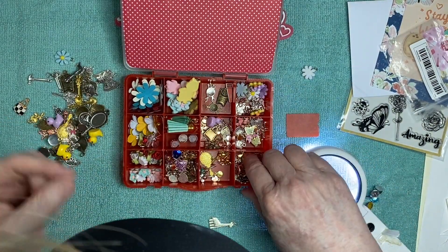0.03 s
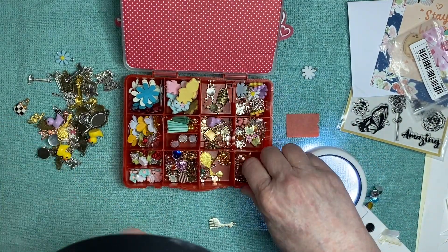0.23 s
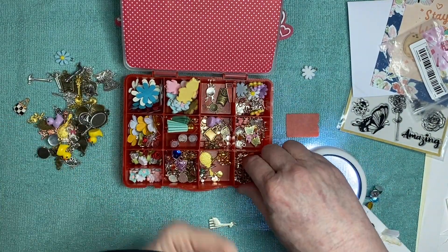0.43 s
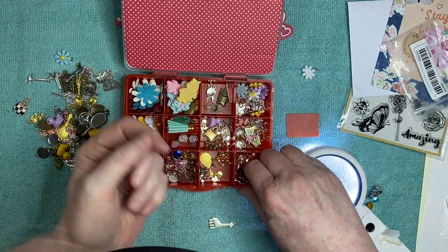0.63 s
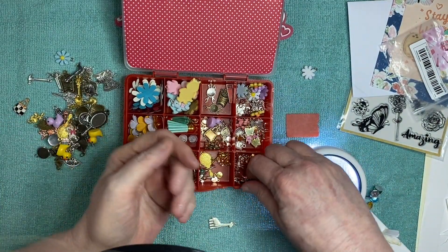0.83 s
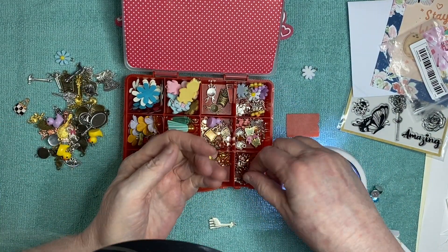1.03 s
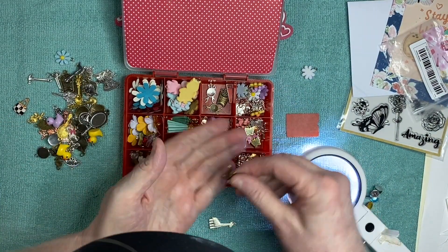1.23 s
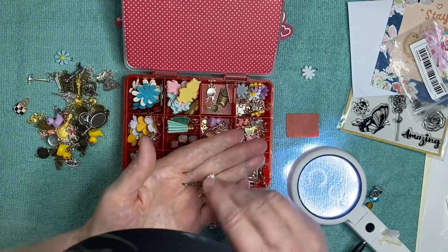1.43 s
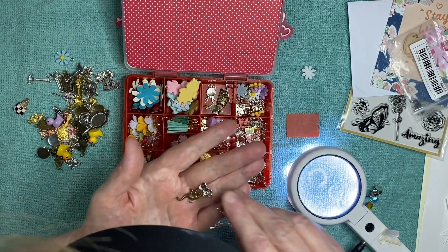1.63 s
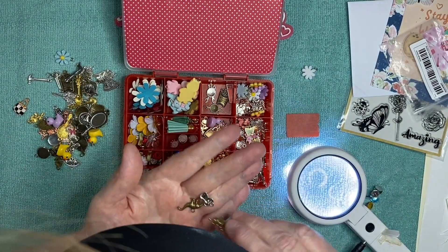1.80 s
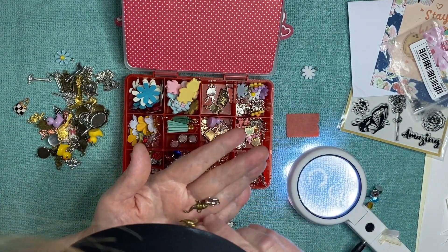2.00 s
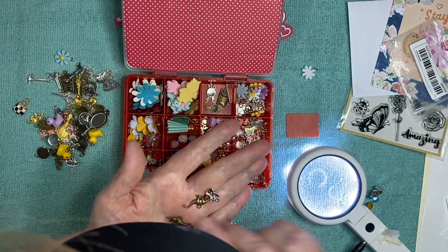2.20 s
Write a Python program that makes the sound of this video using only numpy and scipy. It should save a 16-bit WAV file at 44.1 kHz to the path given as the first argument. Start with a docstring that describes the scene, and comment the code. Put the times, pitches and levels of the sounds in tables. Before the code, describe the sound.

Small metal charms grind, jingle and tick against a plastic organizer box as fingers dig through them, a few dropping back at about one second, then faint bright clinks in a palm; close microphone, small quiet room.

```python
"""Fingers rummage through small metal charms in one compartment of a plastic organizer box on a cloth-covered table.
The charms grind and click (short noise bursts and rings) and knock on the box (a few dying tones).
A few charms drop back as the hand lifts out, and tiny clinks with high rings follow in the open palm.
Soft rubs of skin and low rumbles are bands of noise; a small room adds echoes, air noise and a faint hum."""
import sys
import numpy as np
from scipy import signal
from scipy.fft import rfft, irfft, next_fast_len
from scipy.io import wavfile
from scipy.ndimage import uniform_filter1d

SR = 44100
rng = np.random.default_rng(int(sys.argv[2]) if len(sys.argv) > 2 else 0)


def master(y):
    """Save y as 16-bit WAV."""
    cut = np.clip(np.atleast_2d(y).T, -1, 1)
    pcm = np.round(cut * 32767)  # scale
    wavfile.write(sys.argv[1], SR, pcm.astype(np.int16))


N = 99401
T = np.arange(N) / SR


def from_db(db):
    """Turn decibels into a gain."""
    return 10 ** (np.asarray(db) / 20)


def rms_one(x):
    """Scale to an rms (average strength) of 1."""
    return x / np.sqrt(np.mean(x ** 2) + 1e-20)


def at_hz(points, hz):
    """Read a table between its points, on a log-frequency axis."""
    table_hz, values = np.transpose(points)
    return np.interp(np.log(hz + 1), np.log(table_hz), values)


def cut(x, order, hz, kind):
    """Filter that keeps the part below ("low"), above ("high") or between ("band") the given pitches."""
    return signal.sosfilt(signal.butter(order, hz, kind, fs=SR, output="sos"), x)


def colour(x, spectrum):
    """Give x the tone colour of a table, with a filter that answers as early as it can (minimum phase)."""
    size = 2048
    level_db = at_hz(spectrum, np.fft.rfftfreq(size, 1 / SR))
    cepstrum = irfft(np.log(from_db(level_db)))
    # folding the second half onto the first removes any sound before the click
    cepstrum[1:size // 2] *= 2
    cepstrum[size // 2 + 1:] = 0
    response = irfft(np.exp(rfft(cepstrum)))
    return signal.fftconvolve(x, response)[:N]


def clicks(start_s, level_db):
    """Place one single-sample click at each time."""
    out = np.zeros(N)
    places = np.clip(np.asarray(start_s) * SR, 0, N - 1).astype(int)
    np.add.at(out, places, from_db(level_db))
    return out


def ring(x, hz, t60):
    """A small resonator: a unit click starts a sine of height 1 that falls by 60 dB in t60 seconds."""
    shrink = from_db(-60 / (t60 * SR))
    step = 2 * np.pi * hz / SR
    return signal.lfilter([0, np.sin(step)], [1, -2 * shrink * np.cos(step), shrink ** 2], x + 1e-18)


CRACK_RISE_S = 0.00079  # a contact skids briefly before it peaks


def crack(x, decay_s):
    """Each click becomes a burst of noise that swells and dies at once."""
    power = signal.lfilter([1], [1, -np.exp(-2 / (decay_s * SR))], x ** 2 + 1e-20)
    rise = np.exp(-1 / (CRACK_RISE_S * SR))
    loudness = np.sqrt(signal.lfilter([1 - rise], [1, -rise], power))
    return loudness * rng.standard_normal(N)


def swell(middle_s, length_s, level_db, centre_hz, octaves):
    """A band of friction noise that rises to its level at the middle and falls again."""
    edges = [centre_hz * 2 ** (-octaves / 2), centre_hz * 2 ** (octaves / 2)]
    noise = rms_one(cut(rng.standard_normal(N), 2, edges, "band"))
    hump = np.cos(np.pi * np.clip((T - middle_s) / length_s, -.5, .5))
    return from_db(level_db) * noise * hump


# tone colour of the ventilation noise, before it is set to its overall level: pitch_hz, relative_level_db
AIR_COLOUR = [(20, -22), (40, -8), (62, -3), (100, -3), (190, -7), (340, -9), (520, -8), (820, -11.5),
              (1040, -15.5), (1300, -21), (2000, -26.5), (3000, -35), (3500, -35), (4300, -40.5),
              (6300, -51), (10000, -47), (16000, -56)]
# how alike the room noise is at left and right: pitch_hz, likeness (0 to 1)
LEFT_RIGHT_LIKENESS = [(60, 1), (150, .93), (300, 0.77), (700, 0.097), (2000, 0.31), (8000, 0.099)]
# hum and faint whine of the ventilation: pitch_hz, level_db
HUM_LINES = [(61, -70), (325, -70), (458, -67.5), (805, -76), (1017, -70), (3480, -88.5)]
AIR_DB = -56.5
HUM_WIDTH_HZ = 6.2  # this far from its centre a hum line has half its strength


def room_noise():
    """Ventilation: steady coloured noise, plus hum lines made wavering by their narrow width."""
    hz = np.fft.rfftfreq(N, 1 / SR)
    alike = np.clip(at_hz(LEFT_RIGHT_LIKENESS, hz), 0, 1)
    shared, opposed = rfft(rng.standard_normal((2, N))) * from_db(at_hz(AIR_COLOUR, hz))
    air = np.sqrt(1 + alike) * shared + np.sqrt(1 - alike) * opposed * [[1], [-1]]
    air = rms_one(irfft(air, N))
    white = rfft(rng.standard_normal(N))
    hum = 0
    for line_hz, level_db in HUM_LINES:
        narrow = white / (1 + ((hz - line_hz) / HUM_WIDTH_HZ) ** 2)
        hum = hum + from_db(level_db) * rms_one(irfft(narrow, N))
    return from_db(AIR_DB) * air + hum


def reflections(x, t60, cut_hz):
    """Dense dying echoes, different at each side: x is smeared by a fading noise tail."""
    tail = rng.standard_normal((2, N)) * from_db(-60 * T / t60)
    tail = cut(tail * (T > .001), 1, cut_hz, "low")
    return signal.fftconvolve(x[None], rms_one(tail) / np.sqrt(N), axes=1)[:, :N]


# how far the phase of left is turned ahead of right: pitch_hz, left_lead_radians
STEREO_PHASE = [(1800, 0), (2900, .9), (4300, .9), (5000, .2), (7100, 3.05), (7700, 3.3), (10000, 6.2),
                (11200, 6.3), (13000, 9.2), (13800, 9.55), (15200, 11.2)]
PAN_DB = -0.13  # added at left, taken away at right


def stereo_processing(x):
    """Stereo processing turns the phase of left against right, by an amount that depends on pitch."""
    size = next_fast_len(N + SR // 10)
    lead = np.interp(np.fft.rfftfreq(size, 1 / SR), *np.transpose(STEREO_PHASE))
    # half of the lead goes forward on the left, half backward on the right
    both = irfft(rfft(x, size) * np.exp(.5j * lead * [[1], [-1]]), size)[:, :N]
    return both * from_db([[PAN_DB], [-PAN_DB]])


# the pushed box rumbles on the table: middle_s, length_s, peak_level_db
SHOVE_TIMES = [(0.03, 0.109, -54), (0.125, 0.079, -59), (0.198, 0.072, -46.5), (0.248, 0.026, -46.5),
               (0.599, 0.12, -53), (0.71, 0.23, -58.5)]
SHOVE_HZ, SHOVE_OCTAVES = 82.7, 1.8  # centre and width of the rumble


def shoves():
    """The nudged box rubs on the table: short swells of low noise."""
    return sum(swell(*row, SHOVE_HZ, SHOVE_OCTAVES) for row in SHOVE_TIMES)


# skin slides over skin and charms: middle_s, length_s, peak_level_db, centre_hz, width_octaves
SKIN_RUBS = [(1.156, 0.033, -68, 3470, 0.27), (1.183, 0.02, -64, 1800, 0.35), (1.37, 0.11, -73, 3500, 0.27),
             (1.7, 0.12, -76, 9700, 0.44), (2.23, 0.058, -62.5, 1707, 2.6),
             (2.233, 0.045, -64, 10340, 0.43)]
RUB_GRAIN_DB = 1.5  # typical swing of the loudness as skin catches and slips


def rubs():
    """Skin catches and slips as it slides: swells of noise with a grainy loudness."""
    wander = rms_one(uniform_filter1d(rng.standard_normal(N), size=100))
    grain = rms_one(from_db(RUB_GRAIN_DB * wander))
    return grain * sum(swell(*row) for row in SKIN_RUBS)


# charms meet in the palm: start_s, ring_db, tick_db, free (multiplies the ring times of the charm)
CLINKS = [(1.356, -69, -43.5, 0.68), (1.428, -46.5, -31, 1.7), (1.532, -45, -61, 0.5)]
# the tones of the charm in the palm: pitch_hz, level_db (added to ring_db), t60_s (before free)
CHARM_TONES = [(11630, -10, 0.12), (14080, -18, 0.13), (15680, 0.5, 0.1), (16100, -7.5, 0.02)]
PALM_TICK_S, PALM_TICK_HZ = 0.00032, 11500  # the thin tick: decay, lowest pitch
PALM_BEAT_HZ = 21  # gap between the two tones of a pair, before division by free


def palm():
    """Charms clink in the hand: a thin tick, then pairs of close tones that beat, damped by the skin."""
    start_s, _, tick_db, _ = np.transpose(CLINKS)
    out = cut(crack(clicks(start_s, tick_db), PALM_TICK_S), 2, PALM_TICK_HZ, "high")
    for start_s, ring_db, _, free in CLINKS:
        for hz, level_db, t60 in CHARM_TONES:
            blow = clicks([start_s], [ring_db + level_db])
            out = out + ring(blow, hz, t60 * free)
            out = out + .5 * ring(blow, hz + PALM_BEAT_HZ / free, t60 * free / 2)
    return out


# a fingertip presses charms against a divider: start_s, level_db
DIVIDER_KNOCKS = [(.029, -30), (0.3668, -28), (0.3697, -35), (0.766, -28.5), (0.769, -27.5), (.9115, -30.5)]
# the tones of the divider: pitch_hz, level_db (added to the knock), t60_s
DIVIDER_TONES = [(1000, -16.5, 0.028), (1342, -1.5, 0.02), (1630, -7, 0.0103)]


def wall_knocks():
    """Dull knocks on the divider between compartments: each sets its few tones ringing briefly."""
    blows = clicks(*np.transpose(DIVIDER_KNOCKS))
    return sum(from_db(level_db) * ring(blows, hz, t60) for hz, level_db, t60 in DIVIDER_TONES)


# the tones of the plastic box: pitch_hz, level_db (added to the contact), t60_s
BOX_TONES = [(1008, -14, 0.02437), (1372, -12, 0.014), (1800, -11, 0.01), (2130, 2.5, 0.017),
             (2360, 1.5, 0.015), (4730, -10, .008), (5018, -3.5, 0.013), (5456, -10, 0.0066),
             (8200, -6, 0.016)]
SPOTS = 12
SPOT_DETUNE = 0.0088  # from spot to spot the pitches shift by up to this share, up or down


def box(x, vary_db):
    """Each contact lands on one of a dozen spots, and tones of uneven strength ring with alternating sign."""
    spot = rng.integers(0, SPOTS, N)
    strengths = from_db(vary_db * rng.standard_normal((len(BOX_TONES), N))) * x
    out = 0
    for k, detune in enumerate(np.exp(SPOT_DETUNE * np.linspace(-1, 1, SPOTS))):
        here = spot == k
        for m, (hz, level_db, t60) in enumerate(BOX_TONES):
            # neighbouring tones swing against each other, so a knock swells and stops short
            out = out + (-1) ** m * from_db(level_db) * ring(strengths[m] * here, hz * detune, t60)
    return out


# tone colour of metal on metal, for the jingle, the ticks and the hard clicks: pitch_hz, level_db
METAL_COLOUR = [(300, -15.5), (750, -20.5), (1000, -7.5), (1600, -4.5), (2250, 0.5), (3500, -7.5),
                (5200, 2.5), (6500, -3.5), (9300, -5), (12500, -8), (15500, -7)]
JINGLE_T60_S, JINGLE_LOW_HZ, JINGLE_HIGH_HZ = 0.022, 2590, 14980


def jingle(touches):
    """Each touch sets one of 30 small charms ringing, damped at once by the heap."""
    pitches = np.geomspace(JINGLE_LOW_HZ, JINGLE_HIGH_HZ, num=30) * rng.uniform(.98, 1.02, 30)
    dealt = rng.integers(0, len(pitches), N)
    out = 0
    for k, hz in enumerate(pitches):
        out = out + ring(touches * (dealt == k), hz, JINGLE_T60_S) * from_db(at_hz(METAL_COLOUR, hz))
    return out


TOUCH_DECAY_S = 0.0016
TICK_VARY_DB, SPLIT_HZ = 7.5, 7100  # the parts below and above the split vary separately


def ticks(touches):
    """Dry metal ticks: noise bursts, some dull and some bright."""
    out = 0
    for kind in ("low", "high"):
        uneven = touches * from_db(TICK_VARY_DB * rng.standard_normal(N))
        out = out + cut(crack(uneven, TOUCH_DECAY_S), 2, SPLIT_HZ, kind)
    # the division evens out the energy that a longer decay would add
    return colour(out, METAL_COLOUR) / np.sqrt(TOUCH_DECAY_S * SR / 2)


# single hard contacts: start_s, click_db (before CLICK_DB), box_knock_db (before KNOCK_DB)
HARD_HITS = [(.029, -10.5, -26.5), (0.0664, -11.5, -31), (0.0952, -20, -38.5), (0.1635, -14.5, -27.5),
             (0.1731, -12, -30.5), (.2035, -28, -28.5), (.2205, -27.5, -25), (0.2428, -20, -28),
             (.2866, -22, -28.5), (.3664, -27.5, -26), (.3695, -27.5, -27), (0.3769, -18, -26),
             (0.387, -5, -21.5), (.3905, -9, -26), (0.397, -19.5, -29), (0.4112, -9, -30),
             (0.4521, -24.5, -54), (0.514, -24, -68.5), (0.5987, -15.5, -31), (.657, -19.5, -26),
             (0.7015, -10.5, -27), (0.7054, -1.5, -26.5), (.7295, -14.5, -31), (.755, -19.5, -38),
             (0.7645, -31, -27), (0.7848, -22.5, -24.5), (0.7943, -22, -26), (0.8036, -31.5, -27.5),
             (0.8719, -27, -41.5), (0.882, -24, -43.5), (.894, -22, -48.5), (.911, -7.5, -18.5),
             (0.9162, -18.5, -37), (0.9335, -11, -18.5), (0.9355, -9.5, -17.5), (0.9407, -13.5, -25),
             (0.9454, -0.5, -12.5), (0.9581, -14.5, -22), (0.9627, -9, -20), (0.9652, -14, -22.5),
             (0.9761, -14, -23.5), (0.9826, -26.5, -28)]
# a loose charm rings on: start_s, pitch_hz, level_db, t60_s
LOOSE_RINGS = [(0.07, 11830, -33.5, 0.038), (0.7023, 5330, -22, .03), (0.795, 11860, -45.5, 0.11),
               (0.913, 12040, -31.5, 0.05), (0.961, 15160, -20.5, 0.045), (.969, 15200, -31, 0.12)]
CLICK_DB, KNOCK_DB = -5.5, -2  # added to all clicks and to all knocks
CLICK_DECAY_S = 0.00099


def hard_contacts():
    """Charms snap past each other or drop onto the box: a metal burst and a box knock; some ring on."""
    start_s, click_db, knock_db = np.transpose(HARD_HITS)
    metal = colour(crack(clicks(start_s, click_db + CLICK_DB), CLICK_DECAY_S), METAL_COLOUR)
    knocks = box(clicks(start_s, knock_db + KNOCK_DB), vary_db=3.0)
    pings = sum(ring(clicks([at], [level_db]), hz, t60) for at, hz, level_db, t60 in LOOSE_RINGS)
    return metal + knocks + pings


# how hard the fingers stir the heap: time_s, level_db (before the shares below)
STIR_LEVEL = [(0, -40.5), (.023, -45.5), (.04, -40), (.13, -38.5), (.15, -34), (.245, -32), (.275, -49.5),
              (.3, -42.5), (.35, -57.5), (.365, -45), (.385, -26), (.415, -31.5), (.44, -45.5), (.49, -55),
              (.565, -55), (.6, -30), (.625, -32), (.645, -41.5), (.695, -42), (.708, -31), (.74, -34.5),
              (.805, -46.5), (.825, -54.5), (.86, -52.5), (.88, -45), (.93, -46), (.942, -32), (.975, -28),
              (.992, -42.5), (1.06, -70)]
TOUCHES_PER_S = 1100  # on average
TOUCH_SPREAD_DB = 3.5  # scale of the random extra strength, which stops at twice this
GRIND_DB, JINGLE_DB, GRIND_BOX_DB = -1.5, -20, -33  # ticks, rings and box: added to the stirring
BOX_FOLLOWS = 0.8  # share of the stirring's swing in dB that the box follows


def stirring():
    """Many small uneven touches in the heap, each a metal tick, a short ring and a tap on the box."""
    level_db = np.interp(T, *np.transpose(STIR_LEVEL), right=-140)
    sizes = from_db(TOUCH_SPREAD_DB * np.minimum(rng.exponential(1, N), 2))
    sizes = sizes * rng.choice([-1, 1], N)
    touches = rms_one((rng.random(N) < TOUCHES_PER_S / SR) * sizes)
    grind = ticks(touches * from_db(level_db + GRIND_DB))
    rings = jingle(touches * from_db(level_db + JINGLE_DB))
    taps = box(touches * from_db(BOX_FOLLOWS * level_db + GRIND_BOX_DB), vary_db=4.0)
    return grind + rings + taps


CONTACT_LOW_HZ = 653  # contact sounds are thinned below this pitch
TABLE_T60_S, TABLE_DB = 0.072, -14  # early reflections off table and hands, made from one echo pattern
SCATTER_T60_S, SCATTER_DB = .09, -16  # early reflections that differ between the sides
ROOM_T60_S, ROOM_DB, ROOM_CUT_HZ = 0.39, -23, 2300


def scene():
    """Box, charms and hands close to the microphone in a small room."""
    contacts = stirring() + hard_contacts() + wall_knocks() + palm()
    near = cut(contacts, 2, CONTACT_LOW_HZ, "high")
    early = from_db(TABLE_DB) * reflections(near, TABLE_T60_S, cut_hz=7900)[0]
    scatter = from_db(SCATTER_DB) * reflections(near, SCATTER_T60_S, cut_hz=1500)
    late = from_db(ROOM_DB) * reflections(near, ROOM_T60_S, ROOM_CUT_HZ)
    close_sound = stereo_processing(near + early + rubs() + shoves())
    return close_sound + scatter + late + room_noise()


CUTOFF_HZ = 16250


def record(dry):
    """The top of the treble is cut steeply."""
    return signal.sosfilt(signal.ellip(10, .3, 70, CUTOFF_HZ, fs=SR, output="sos"), dry)


dry = scene()
out = record(dry)
master(out)
```